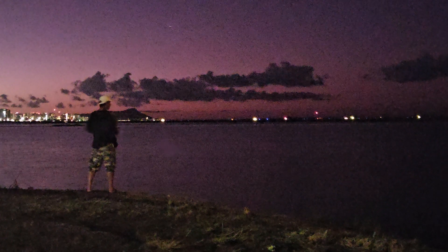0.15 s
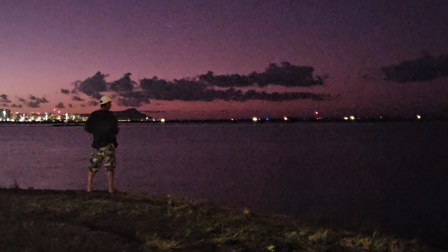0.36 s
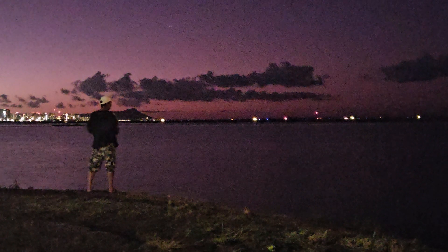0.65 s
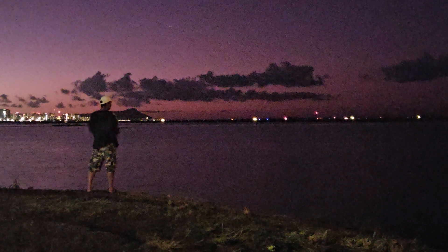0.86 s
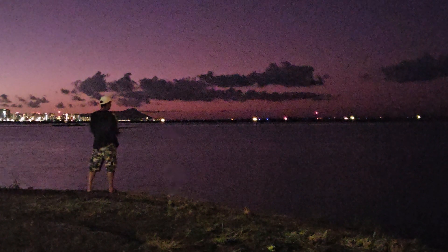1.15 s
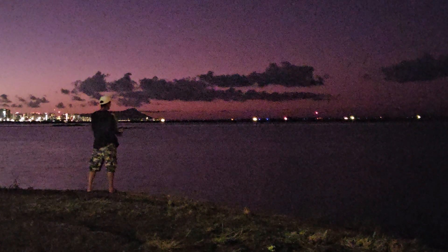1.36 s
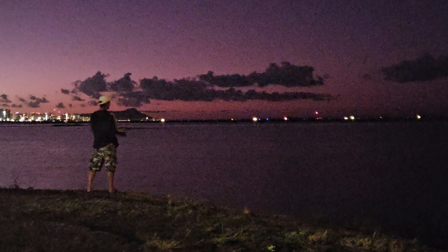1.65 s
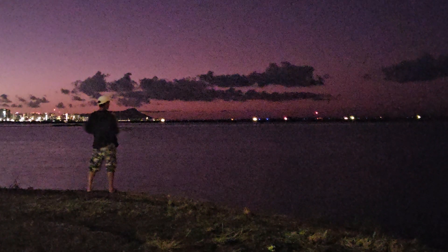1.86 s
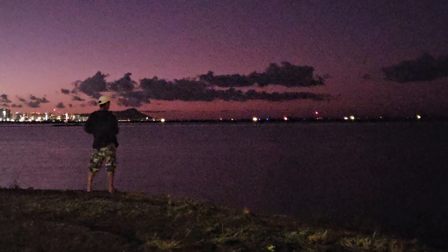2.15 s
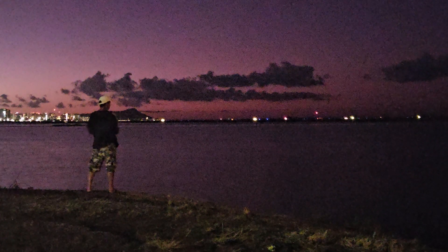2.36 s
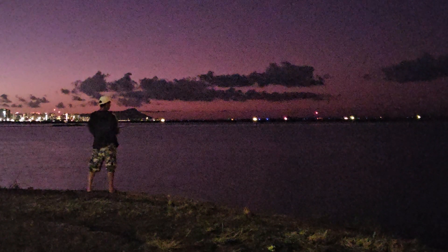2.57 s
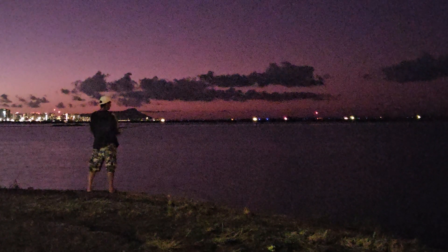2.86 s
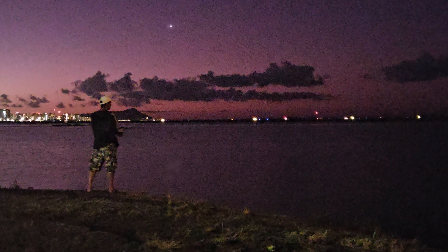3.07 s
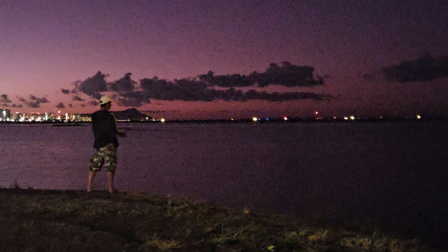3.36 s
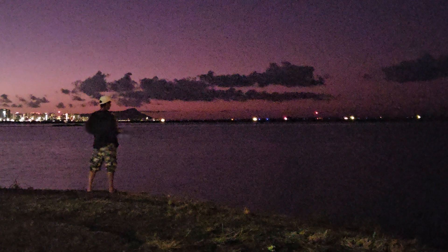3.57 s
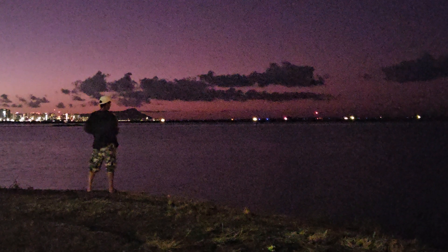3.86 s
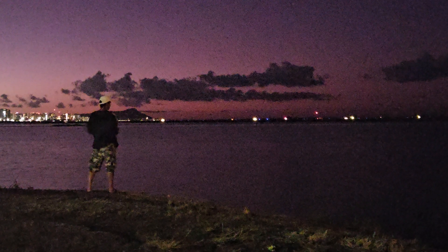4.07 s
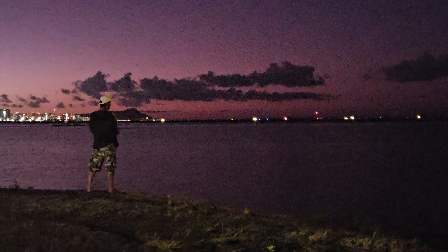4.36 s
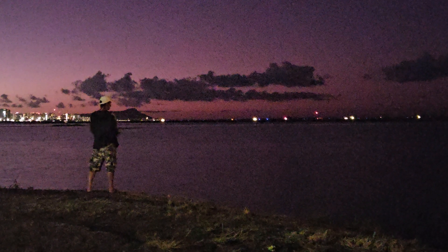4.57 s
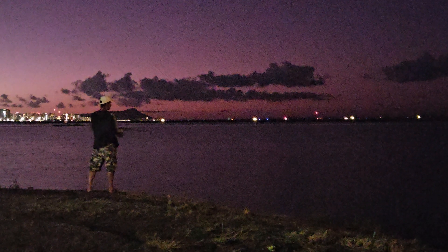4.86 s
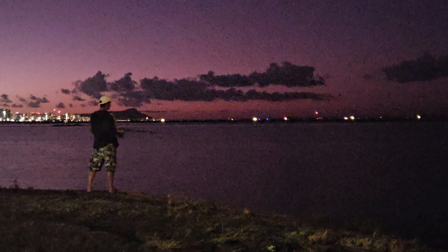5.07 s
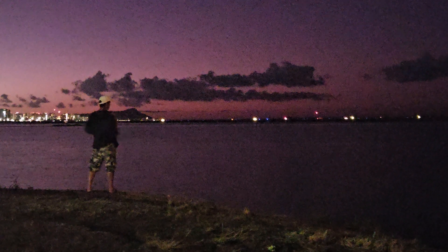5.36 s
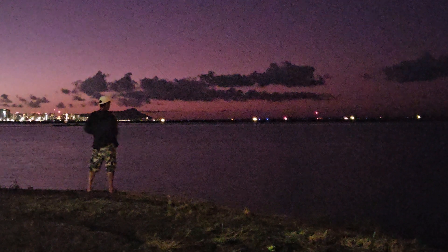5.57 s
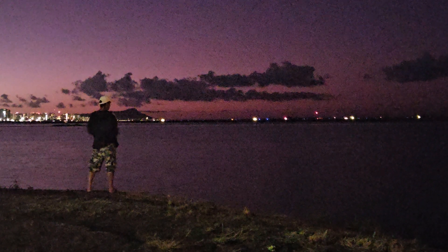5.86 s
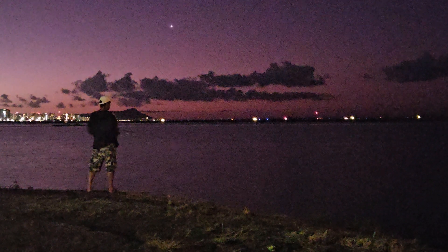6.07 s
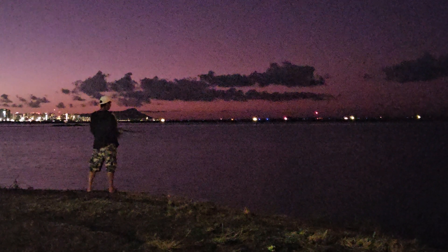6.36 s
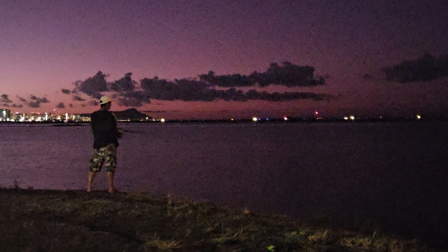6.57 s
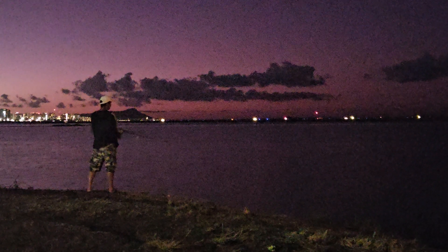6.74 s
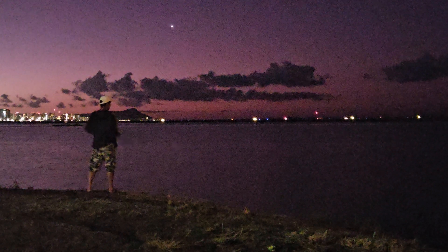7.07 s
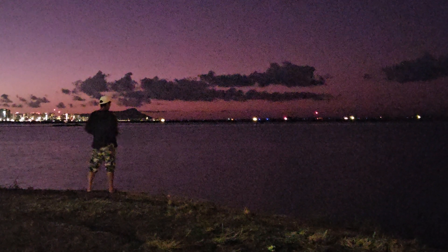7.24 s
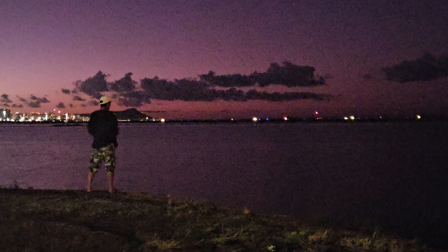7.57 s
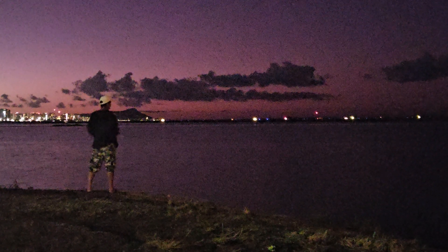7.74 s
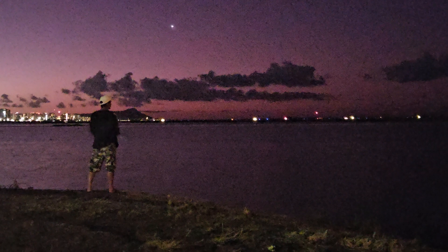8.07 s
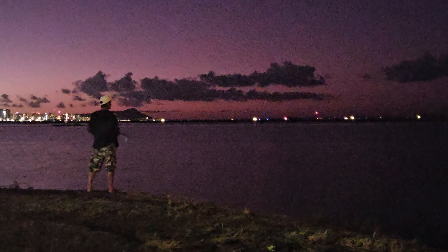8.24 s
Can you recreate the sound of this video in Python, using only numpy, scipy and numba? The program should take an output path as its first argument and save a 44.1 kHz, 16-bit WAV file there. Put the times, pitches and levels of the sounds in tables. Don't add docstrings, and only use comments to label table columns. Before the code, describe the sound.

Close, crisp grass crackles and small foot crunches in the first two seconds sit over a low, far jet rumble. A calmer stretch follows, then more stem snaps around four seconds as the aircraft surges in. Its roar swells and sags, with hiss and a falling whine, still loud at the cut. Open air, two closely spaced microphones, the jet arriving first on the right, a soft town hum left.

```python
import sys
import numpy as np
from scipy import signal
from scipy.fft import rfft, irfft, next_fast_len
from scipy.io import wavfile
from scipy.ndimage import map_coordinates
from numba import njit

SR = 44100
rng = np.random.default_rng(int(sys.argv[2]) if len(sys.argv) > 2 else 0)


def field_ratio(decibels):
    return 10 ** (np.asarray(decibels, dtype=float) / 20)


def transcribe(signal):
    frames = np.atleast_2d(signal).T
    limited = np.clip(frames, -1, 1)
    pcm = np.round(limited * 32767).astype(np.int16)
    wavfile.write(sys.argv[1], SR, pcm)


N = 370881
SIZE = next_fast_len(N + 4096)
HZ = np.arange(SIZE // 2 + 1) * SR / SIZE + 1e-3
TIME = np.arange(N) / SR

# t/s, nearness level/dB, aft turn of the exhaust level/dB
FLIGHT = [(0, -25.5, -6), (.9, -22.5, -2.5), (1.6, -20, -11), (2.3, -21.5, -4), (3, -19.5, -1.5),
          (3.7, -18, -0.5), (4.2, -10, -3), (4.6, -7, -8), (5.1, -5, -1.5), (5.5, -2, -1.5), (5.9, -2.5, 1),
          (6.4, -1, 0), (6.8, -0.5, -2.5), (7.2, -1.5, -.5), (7.7, 0, -1), (8.41, 1, 1)]
# t/s, half length/s, level/dB
SURGES = [(1.45, 0.35, -4), (1.95, 0.14, 5), (4.203, .08, 1.5), (4.55, 0.088, 2), (4.904, 0.051, 0.5),
          (5.19, .05, 2), (5.35, 0.14, 5), (6.26, 0.15, 9), (6.5, 0.045, 3), (7.02, 0.14, 3.5),
          (7.387, .07, 5.5), (7.992, 0.17, 5.5)]
# level/dB close by, dB per dB of nearness, of aft turn, of surge
JET_LAYERS = [
    (-20, 0.47, 0.97, 0.046),
    (-30, 0.92, 0.06, 0.52),
    (-37, 1.04, 0.063, 0.93),
    (-47.5, 0.71, 0.53, 0.98),
    (-51.5, 0.3, .05, 1.2),
]
# low f/Hz, high f/Hz
JET_BANDS = [
    (25, 200),
    (200, 800),
    (800, 2100),
    (2700, 5500),
]
# f/Hz, level/dB per Hz
EXHAUST_COLOUR = [(18, -62.5), (30, -48.5), (65, -41), (110, -41.5), (200, -49), (330, -53.5), (520, -53),
                  (750, -59.5), (1400, -62), (2300, -67.5), (3500, -73), (4550, -77), (4900, -82),
                  (6000, -92.5), (11000, -132)]
# f/Hz, share/0-1
EXHAUST_DIRECT = [(100, .999), (180, .99), (320, .96), (900, .98), (1700, .87), (4500, .88), (6500, .45)]
# t/s, first dip f/Hz, strength/0-1
GROUND_ECHO = [(0, 328, 0.13), (3.5, 346, 0.11), (4.3, 443, 0.48), (5.3, 340, 0.02), (5.8, 370, 0.31),
               (6.3, 384, 0.31), (6.8, 363, 0.5), (7.3, 284, 0.82), (7.7, 262, 0.5), (8.1, 232, 0.52),
               (8.41, 252, 0.2)]
# t/s, f/Hz
FAN_NOTE = [(0.0, 2549), (1.2, 2520), (2.4, 2483), (3.6, 2435), (4.81, 2372), (6.01, 2313), (7.21, 2240),
            (8.41, 2183)]
# t/s, width/Hz
WHINE_WIDTH = [(0, 70), (2, 52), (3.8, 34), (5, 20), (8.41, 14)]
# t/s, half length/s, level/dB
GLINTS = [(.55, .12, -5), (1.07, .1, 6), (1.2, .04, -7), (1.65, .35, 6), (2.9, .15, 3), (3.27, .07, 3),
          (3.55, .1, -3), (3.86, .08, 5), (4.6, .2, -0.5), (4.97, .08, -3), (5.2, .05, 8), (5.9, 0.1, 6),
          (6.2, 0.068, 6.5), (6.37, .04, -4), (6.52, .1, 6), (6.72, .04, -1.5), (6.8, .04, 6),
          (7.26, 0.077, 9.5), (7.53, .08, 1), (7.92, 0.046, 5.5), (8.17, .04, -8), (8.33, .12, 2.5)]
# t/s, lead/samples
RIGHT_LEAD = [(0, 24), (6, 24), (8.41, 22)]
# t/s, hold/s, crackle level/dB
RUSTLE = [(.165, 0.013, -62), (.24, 0.24, -81), (.555, .01, -67), (.65, 0.098, -66.5), (.77, .17, -61),
          (.95, 0.037, -61), (1.035, .015, -60.5), (1.11, .01, -73), (1.74, 0.0082, -83),
          (1.87, 0.035, -64.5), (1.965, .045, -58.5), (2.16, 0.024, -71.5), (2.35, 0.022, -77),
          (3.56, 0.025, -74.5), (3.65, .015, -67.5), (3.74, .08, -73.5), (3.96, 0.037, -67),
          (4.06, .1, -69), (4.18, .06, -61), (4.28, .17, -61.5), (4.515, 0.0077, -65), (5.29, .06, -71.5),
          (5.45, 0.39, -77), (5.88, .05, -64.5), (5.97, 0.13, -69), (6.95, 0.33, -77.5),
          (7.09, .015, -70.5), (7.54, 0.079, -66), (7.66, .4, -77.5), (8.32, 0.075, -68)]
# f/Hz, level/dB
CRACKLE_COLOUR = [(1500, -19.5), (3000, 5.5), (5000, 0.5), (6500, 0), (8000, 2.5), (9500, -2), (11000, -14),
                  (13000, -12), (16000, -15.5)]
# t/s, hold/s, level/dB
STEPS = [
    (.166, 0.014, -50.5),
    (.55, 0.2, -67.5),
    (.735, 0.12, -59),
    (.93, 0.047, -57.5),
    (1.045, .01, -62),
    (1.865, 0.044, -54.5),
    (1.96, 0.045, -51.5),
]
# f/Hz, level/dB
CRUNCH_COLOUR = [(120, -20), (260, 3), (600, 0), (900, -6), (1600, 1), (2200, -1), (3200, -5), (5000, -12),
                 (8000, -25)]
# t/s, peak level/dB, f/Hz
SNAPS = [(0.13, -64, 6090), (0.1645, -49, 6940), (0.1666, -50, 6960), (0.5478, -57.5, 7550),
         (0.9395, -44, 7440), (0.9678, -42, 6830), (0.9834, -41, 7200), (1.0375, -46, 8900),
         (1.05, -38, 7540), (1.1118, -50, 7350), (1.8795, -46, 7220), (1.975, -40.5, 7100),
         (3.653, -46, 7330), (3.7384, -49, 7660), (3.9602, -50.5, 7300), (4.111, -45.5, 8700),
         (4.208, -43.5, 8000), (4.2991, -42.5, 7300), (4.361, -45, 8800), (4.372, -43.5, 7800),
         (4.4052, -41, 7500), (4.4276, -41, 7900), (4.507, -48, 7500), (5.885, -56.5, 8110),
         (6.0153, -54.5, 6770), (6.0323, -52, 6050), (7.0972, -51, 6297), (7.3545, -56, 7800),
         (7.5413, -47, 6130), (7.5704, -48.5, 6520)]
# t/s, peak level/dB, pop f/Hz, thump above the pop level/dB
KNOCKS = [(0.1672, -45, 3030, 0), (.9675, -46, 3200, -6), (1.05, -46.5, 3750, -5),
          (1.8794, -41.5, 3210, -3), (1.9012, -42, 2500, -2), (1.93, -38, 3350, 1),
          (1.9635, -45, 1900, 7.5), (1.967, -42, 1910, -1), (1.9789, -43, 2120, 6.5),
          (2.0022, -44, 2500, 3), (2.0107, -47, 1330, -4), (4.37, -34, 3580, 2)]
# f/Hz, level/dB per Hz
TOWN_COLOUR = [(20, -65.5), (45, -52), (75, -55), (140, -75.5), (330, -87), (520, -78), (830, -82),
               (930, -90), (2000, -93), (3500, -100), (5400, -102), (5900, -109), (10500, -128),
               (16000, -131)]
# f/Hz, share/0-1
TOWN_DIRECT = [(100, .98), (600, .7), (1500, .3), (5000, .1)]
# f/Hz, left minus right level/dB
PORTS = [(60, 1), (800, .6), (1800, 1), (2600, -.5), (4000, -4.5), (8000, -9), (9500, -9), (10700, 0),
         (12000, 6), (14500, 2)]

RUB_RISE_DB_S, STEP_RISE_DB_S, FALL_DB_S = 350, 900, 451.5
STILL_DB = -88
INSECT_HZ, INSECT_WIDTH_HZ, INSECT_DB = 11500, 450, -95.5
DUCK_FROM_DB, DUCK_RATIO = -3.5, .9


def over_hz(table, hz=HZ):
    f, value = np.transpose(table)
    return np.interp(np.log(hz), np.log(f), value)


def over_time(table):
    s, *columns = np.transpose(table)
    return [np.interp(TIME, s, column) for column in columns]


def bumps(rows):
    return sum(db * np.exp(-((TIME - s) / half) ** 2) for s, half, db in rows)


def walk(rate):
    step = .004
    knots = rng.standard_normal(int(N * rate / SR) + 3)
    fine = map_coordinates(knots, [np.arange(0, N / SR + .01, step) * rate], order=3, mode="nearest")
    return np.interp(TIME, np.arange(len(fine)) * step, fine)


def unit(x):
    return x / np.sqrt(np.mean(x ** 2))


def colour(x, gain):
    return irfft(rfft(x, SIZE) * gain, SIZE)[..., :N]


def late(x, samples, order=3):
    return map_coordinates(x, [np.arange(N) - samples], order=order, mode="nearest")


def noise_pair(table, direct):
    common, left, right = rfft(rng.standard_normal((3, SIZE)))
    share = np.clip(over_hz(direct), 0, 1)
    pair = np.sqrt(share) * common + np.sqrt(1 - share) * np.array([left, right])
    return pair * field_ratio(over_hz(table)) * np.sqrt(SR / 2)


def bands(pair, gain_db):
    out = 0
    place = 2 * np.log2(HZ / 20)
    for k in range(20):
        skirt = np.cos(np.pi / 2 * np.clip(place - k, -1, 1)) ** 2
        out = out + irfft(pair * skirt, SIZE)[:, :N] * field_ratio(gain_db(20 * 2 ** (k / 2)))
    return out


@njit
def ring(x, hz, width):
    y, band, low = np.empty(len(x)), 0., 0.
    for i in range(len(x)):
        g, k = np.tan(np.pi * hz[i] / SR), width[i] / hz[i]
        v = (band + g * (x[i] - low)) / (1 + g * (g + k))
        band, low, y[i] = 2 * v - band, low + 2 * g * v, k * v
    return y


def airliner():
    near, aft = over_time(FLIGHT)
    surge = bumps(SURGES)
    *levels_db, whine_db = [db + a * near + b * aft + c * surge for db, a, b, c in JET_LAYERS]
    roar = np.array([ground(x) for x in exhaust(levels_db)])
    whine = fan(whine_db + bumps(GLINTS) + .8 * walk(5))
    left, right = roar + whine
    return np.array([late(left, over_time(RIGHT_LEAD)[0]), right])


def exhaust(levels_db):
    power = field_ratio(2 * over_hz(EXHAUST_COLOUR)) * SR / SIZE
    swell = []
    for db, (lo, hi) in zip(levels_db, JET_BANDS):
        own_db = 10 * np.log10(power[(HZ > lo) & (HZ < hi)].sum())
        swell.append(db - own_db)
    centres = [np.sqrt(lo * hi) for lo, hi in JET_BANDS]
    eddies = walk(12)

    def gain_db(hz):
        weights = [np.interp(np.log(hz), np.log(centres), row) for row in np.eye(4)]
        treble_flutter = np.clip(hz / 3000, 0, 1) * 1.1 * eddies
        flutter = treble_flutter + 0.63 * walk(3.077) + 0.38 * walk(11)
        return sum(w * s for w, s in zip(weights, swell)) + flutter
    return bands(noise_pair(EXHAUST_COLOUR, EXHAUST_DIRECT), gain_db)


def ground(x):
    dip_hz, strength = over_time(GROUND_ECHO)
    lows = colour(x, 1 / (1 + (HZ / 900.0) ** 2))
    return x + np.clip(strength, 0, 1) * late(lows, SR / dip_hz / 2, order=1)


def fan(whine_db):
    (hz,), (width,) = over_time(FAN_NOTE), over_time(WHINE_WIDTH)
    core_gain = np.sqrt(width.min() / width)
    out = 0
    for order, db, spread, core in [(1, -6.5, 1, 3.3), (2, -16, 14, .1), (.5, -12, 1, .6)]:
        narrow = rng.standard_normal(N)
        for _ in range(2):
            narrow = ring(narrow, order * hz, spread * width)
        scattered = unit(narrow / np.sqrt(width))
        wander_hz = order * (hz + .35 * width * walk(14))
        steady = np.sin(2 * np.pi * np.cumsum(wander_hz) / SR)
        distance_db = (order != 1) * 0.44 * (whine_db + 45.0)
        out = out + field_ratio(db + distance_db) * (scattered + core * core_gain * steady)
    return out * field_ratio(whine_db)


def rustle(duck):
    crisp = unit(colour(grains(6000, 4.6, 0.9), field_ratio(over_hz(CRACKLE_COLOUR))))
    dull = unit(colour(grains(600, 1.9, 0.3), field_ratio(over_hz(CRUNCH_COLOUR))))
    rub = movements(RUSTLE, RUB_RISE_DB_S) + duck * field_ratio(STILL_DB)
    rub = rub * field_ratio(1.5 + 1.0 * walk(60))
    crunch = movements(STEPS, STEP_RISE_DB_S) * field_ratio(1.3 * walk(30))
    return rub * crisp + crunch * dull


def grains(rate, scatter_db, hush, cap=3.5):
    click_gain = field_ratio(scatter_db * np.minimum(rng.exponential(size=N), cap))
    clicks = click_gain * (rng.random(N) < rate / SR) * rng.standard_normal(N)
    smear = np.exp(-np.arange(200) / 29.0)
    own = [signal.oaconvolve(clicks, smear * rng.standard_normal(200))[:N] for _ in range(2)]
    friction = hush * rng.standard_normal((2, N))
    return .9 * unit(clicks) + .35 * unit(np.array(own)) + friction


def movements(rows, rise_db_s):
    gain = 0
    for s, hold, db in rows:
        rise_db = rise_db_s * np.clip(s - TIME, 0, 1)
        fall_db = FALL_DB_S * np.clip(TIME - s - hold, 0, 1)
        gain = gain + field_ratio(db - rise_db - fall_db)
    return gain


def snaps():
    out, t = np.zeros(N + 400), np.arange(400) / SR
    bursts = rng.standard_normal((len(SNAPS), 400))
    for (s, db, hz), burst in zip(SNAPS, bursts):
        tone = np.sin(2 * np.pi * hz * t) * np.exp(-t / 0.0013)
        crack = 0.73 * burst * np.exp(-t / .0006)
        start = int(s * SR)
        out[start:start + 400] += field_ratio(db + 2.0) * (tone + crack)
    thin = HZ ** 2 / (HZ ** 2 + 3900.0 ** 2)
    soften = 1 / np.sqrt(1 + (HZ / 9500.0) ** 4)
    return colour(out[:N], thin * soften)


def knocks():
    out, t = np.zeros(N), np.arange(1200) / SR
    for s, db, hz, thump_db in KNOCKS:
        pop = np.sin(2 * np.pi * hz * t) * np.exp(-t / 0.0012)
        thump = field_ratio(thump_db) * np.sin(2 * np.pi * 260 * t) * np.exp(-t / 0.011)
        start = int(s * SR)
        out[start:start + 1200] += field_ratio(db + 1.0) * (pop + thump)
    return out


def town():
    swell = walk(1.0)
    pair = noise_pair(TOWN_COLOUR, TOWN_DIRECT)
    left, right = bands(pair, lambda hz: 0.76 * swell + 0.91 * walk(2.4))
    return np.array([left, np.roll(right, 23)])


def insects():
    gain = 1 / (1 + (2 * (HZ - INSECT_HZ) / INSECT_WIDTH_HZ) ** 4)
    chorus = unit(colour(rng.standard_normal((2, N)), gain))
    return chorus * field_ratio(INSECT_DB + 2.5 * walk(2.5))


def scene():
    near = over_time(FLIGHT)[0]
    duck = field_ratio(-DUCK_RATIO * np.maximum(near - DUCK_FROM_DB, 0))
    close_by = rustle(duck) + snaps() + knocks()
    return airliner() + close_by + duck * town() + duck * insects()


def band_limit(x):
    return signal.sosfilt(signal.butter(12, 15830, fs=SR, output="sos"), x)


def record(dry):
    tilt = field_ratio(over_hz(PORTS) / 2)
    bass_cut = 1j * HZ / (1j * HZ + 8.)
    mix = colour(dry, np.array([tilt, bass_cut / tilt]))
    return band_limit(mix)


dry = scene()
out = record(dry)
transcribe(out)
```